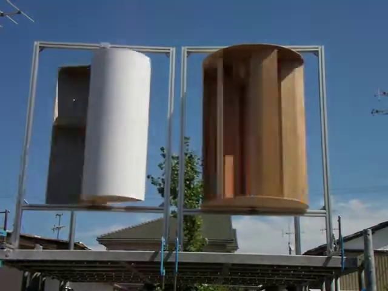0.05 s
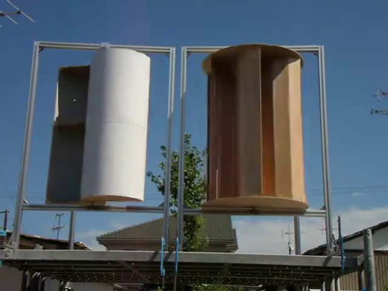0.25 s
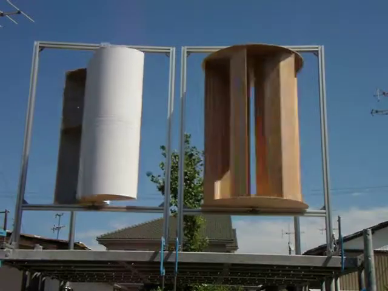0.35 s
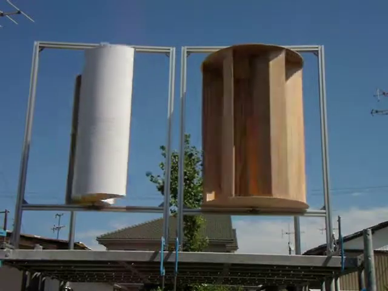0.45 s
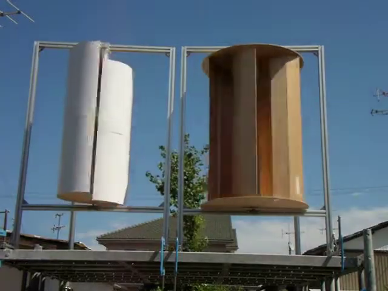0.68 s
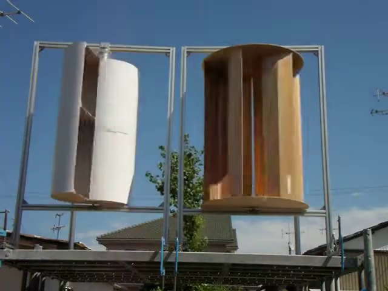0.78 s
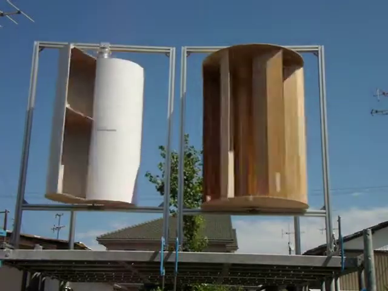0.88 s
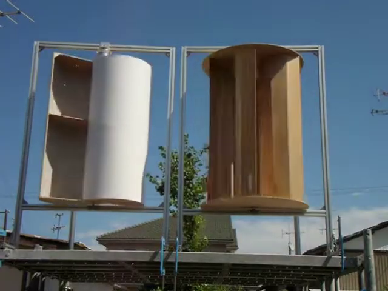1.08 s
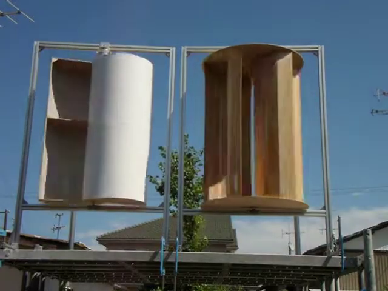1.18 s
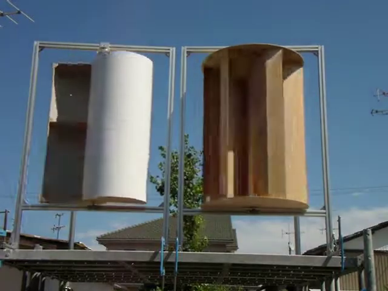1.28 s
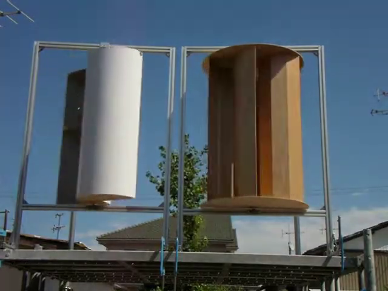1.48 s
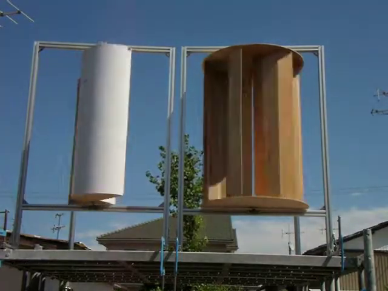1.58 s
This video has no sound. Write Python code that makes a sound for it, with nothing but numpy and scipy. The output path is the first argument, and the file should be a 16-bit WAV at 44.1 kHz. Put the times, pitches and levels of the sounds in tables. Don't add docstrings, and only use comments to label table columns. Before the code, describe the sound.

Wind blows in low, uneven flutters against an unshielded camera microphone in a yard; an early distorted thump snaps off, another heavy blow follows, then softer buffeting over faint hiss and a brief bearing squeak.

```python
import sys
import numpy as np
from scipy import signal
from scipy.fft import rfft, irfft
from scipy.io import wavfile
from scipy.ndimage import uniform_filter1d

SR = 44100
rng = np.random.default_rng(int(sys.argv[2]) if len(sys.argv) > 2 else 0)


def unload_wav(signal):
    wavfile.write(
        sys.argv[1],
        SR,
        np.round(np.clip(np.atleast_2d(signal).T, -1, 1) * 32767).astype(np.int16),
    )


def makeup_ratio(level_db):
    decades = np.asarray(level_db, float) / 20
    return 10 ** decades


N = 72765
THUMP_START_S, THUMP_END_S = .2221, .23535


def unit(x):
    return x / np.sqrt(np.mean(x ** 2))


def coloured(points):
    hz, db = np.array(points, float).T
    f = np.arange(N // 2 + 1) * SR / N
    gain = makeup_ratio(np.interp(np.log(f + 1), np.log(hz), db))
    return unit(irfft(rfft(rng.standard_normal(N)) * gain, N))


def ring(hz, width_hz):
    b, a = signal.iirpeak(hz, hz / width_hz, fs=SR)
    once = signal.lfilter(b, a, rng.standard_normal(N))
    return unit(signal.lfilter(b, a, once))


def smooth(x, k):
    return uniform_filter1d(uniform_filter1d(x, k), k)


def walk(rate_hz):
    k = int(SR / rate_hz)
    held = np.repeat(rng.standard_normal(N // k + 1), k)
    return unit(smooth(held, k)[:N])


def bell(u_s, width_ms):
    return np.exp(-np.log(2) * (2 * u_s * 1000 / width_ms) ** 2)


# crest_s, peak_db, pitch_hz, width_ms
EARLY_STRIKES = [(0.0061, -35.1, 269.0, 8.9), (0.0313, -33.2, 269.0, 5.6), (0.0785, -34.4, 269.0, 8.9),
                 (0.1032, -32.8, 288.0, 8.3), (0.1204, -33.8, 252.0, 9.5), (0.137, -29.6, 308.0, 7.8),
                 (0.1955, -29.4, 137.0, 8.4), (0.2041, -14.6, 168.0, 11.3), (0.213, -22.8, 252.0, 9.5),
                 (0.2202, -14.0, 288.0, 2.4), (0.2542, -18.8, 269.0, 2.6), (0.2603, -17.9, 220.0, 4.1),
                 (0.269, -32.8, 137.0, 17.5), (0.3041, -31.7, 179.0, 10.6), (0.3179, -25.0, 205.0, 11.7),
                 (0.3395, -28.9, 146.0, 7.9), (0.3454, -20.9, 269.0, 3.3), (0.3544, -18.4, 220.0, 10.9)]
MIDDLE_STRIKES = [(0.417, -26.4, 308.0, 6.2), (0.4241, -27.8, 179.0, 13.4), (0.4656, -27.6, 168.0, 14.3),
                  (0.4721, -27.5, 330.0, 7.3), (0.4905, -16.8, 205.0, 9.3), (0.4959, -25.4, 308.0, 7.8),
                  (0.5039, -24.3, 252.0, 9.5), (0.5098, -18.4, 157.0, 15.3), (0.5161, -16.4, 377.0, 6.4),
                  (0.5222, -5.8, 269.0, 7.1), (0.5277, -25.4, 235.0, 10.2), (0.5343, -25.9, 252.0, 9.5),
                  (0.5513, -23.0, 377.0, 6.4), (0.5578, -18.0, 235.0, 8.1), (0.566, -27.4, 157.0, 15.3),
                  (0.5717, -21.0, 288.0, 8.3), (0.5808, -20.1, 220.0, 10.9), (0.5866, -25.8, 353.0, 6.8),
                  (0.5978, -22.8, 269.0, 5.6), (0.6154, -21.1, 205.0, 11.7), (0.6245, -23.6, 220.0, 5.2),
                  (0.6676, -25.7, 179.0, 13.4), (0.6769, -19.0, 269.0, 7.1), (0.6828, -28.6, 330.0, 7.3),
                  (0.6905, -22.4, 192.0, 12.5), (0.6959, -27.5, 269.0, 8.9), (0.7338, -32.6, 168.0, 14.3),
                  (0.7524, -29.1, 205.0, 9.3), (0.7764, -26.4, 168.0, 6.9), (0.7946, -27.6, 235.0, 10.2),
                  (0.8073, -28.0, 137.0, 11.0), (0.8207, -22.1, 168.0, 14.3), (0.8268, -28.3, 288.0, 8.3),
                  (0.8501, -17.6, 192.0, 7.8), (0.8556, -32.9, 146.0, 16.4), (0.8832, -28.2, 220.0, 5.2)]
LATE_STRIKES = [(0.93, -29.4, 269.0, 8.9), (0.9356, -27.4, 192.0, 12.5), (0.942, -34.2, 128.0, 18.8),
                (0.951, -22.9, 205.0, 11.7), (0.9572, -25.4, 308.0, 7.8), (0.964, -13.8, 220.0, 4.1),
                (0.9694, -28.5, 330.0, 7.3), (0.9753, -19.6, 252.0, 6.0), (1.0501, -32.5, 235.0, 10.2),
                (1.056, -32.4, 146.0, 16.4), (1.1302, -34.9, 128.0, 14.9), (1.1669, -28.5, 235.0, 4.9),
                (1.1798, -25.4, 192.0, 6.0), (1.1885, -18.7, 220.0, 8.6), (1.2184, -31.4, 330.0, 7.3),
                (1.225, -25.6, 269.0, 5.6), (1.2393, -30.9, 330.0, 7.3), (1.2504, -31.8, 235.0, 10.2),
                (1.266, -26.3, 157.0, 12.1), (1.2894, -30.5, 137.0, 13.9), (1.303, -31.2, 377.0, 5.0),
                (1.3139, -31.9, 220.0, 6.8), (1.3343, -28.5, 137.0, 11.0), (1.3513, -30.4, 192.0, 12.5),
                (1.3796, -33.7, 137.0, 17.5), (1.4418, -35.4, 146.0, 16.4), (1.5111, -29.0, 192.0, 7.8),
                (1.5211, -33.6, 128.0, 18.8), (1.5272, -31.6, 252.0, 9.5), (1.5363, -25.5, 157.0, 9.6),
                (1.5497, -26.2, 235.0, 8.1), (1.5651, -24.5, 192.0, 12.5), (1.5767, -31.0, 288.0, 8.3),
                (1.586, -31.5, 128.0, 18.8), (1.6048, -33.2, 179.0, 13.4), (1.6222, -28.4, 179.0, 10.6)]
DEEP_STRIKES = [(0.008, -38.4, 98.0, 19.5), (0.2173, -26.9, 119.0, 5.9), (0.3492, -34.5, 74.0, 32.3),
                (0.3694, -28.9, 119.0, 20.1), (0.4297, -22.7, 98.0, 11.8), (0.4517, -32.0, 112.0, 17.0),
                (0.4776, -31.5, 80.0, 30.1), (0.5241, -20.2, 119.0, 5.9), (0.5746, -27.6, 98.0, 24.6),
                (0.6297, -36.0, 74.0, 32.3), (0.6805, -28.6, 112.0, 21.5), (0.7633, -37.5, 80.0, 30.1),
                (0.8279, -34.1, 104.0, 23.0), (0.9535, -34.6, 80.0, 30.1), (0.9739, -32.6, 119.0, 12.6),
                (1.1975, -30.7, 119.0, 15.9), (1.281, -35.0, 80.0, 23.9), (1.5633, -30.9, 104.0, 14.4)]


def eddies(t):
    rise, fall = 1.1, .8
    glide_depth, overtone, reach_s = .04, .1, .07
    out = np.zeros(N)
    rows = list(EARLY_STRIKES) + list(MIDDLE_STRIKES) + list(LATE_STRIKES) + list(DEEP_STRIKES)
    chance = rng.uniform(-1.4, 1, (len(rows), 2))
    for (crest_s, db, hz, ms), (glide, turn) in zip(rows, chance):
        i = slice(max(int((crest_s - reach_s) * SR), 0), min(int((crest_s + reach_s) * SR), N))
        u = t[i] - crest_s
        phase = 2 * np.pi * hz * u * (1 + glide_depth * glide * u * 1000 / ms)
        shape = bell(u, ms * np.where(u < 0, rise, fall))
        second = overtone * shape * np.cos(2 * phase + np.pi * turn)
        out[i] += makeup_ratio(db) * shape * (np.cos(phase) + second)
    return out


# time_s, turbulence_db, bright_share (0-1)
GUST_COURSE = [(0, -47, 0.62), (.13, -44, 0.53), (.19, -42, 0.8), (.28, -42.5, 0.8), (0.331, -42, 0.93),
               (.39, -43, 0.6), (.47, -41.5, 0.6), (.59, -37, 0.23), (0.646, -38.5, 0.36),
               (.72, -44.5, 0.8), (.81, -40.5, 0.5), (.89, -44, 0.63), (1.09, -44.5, 0.5),
               (1.221, -42.5, 0.67), (1.321, -40.5, 0.32), (1.45, -48.5, 0.63), (1.55, -36.5, 0.2),
               (1.65, -43.5, .4)]
# freq_hz, density_db
DEEP_COLOUR = [(30, -29.5), (55, -12), (90, -0.5), (140, 1), (200, -7.5), (350, -14), (700, -69.5)]
# freq_hz, density_db
BRIGHT_COLOUR = [(60, -27), (140, -12.5), (240, -1.5), (330, 0), (480, -5.5), (700, -18.5), (1200, -63)]


def buffeting(t, strikes):
    flutter_db, flutter_hz = 2.0, 60
    wake_db, wake_s = -20, .02
    when, db, share = np.array(GUST_COURSE, float).T
    share = np.clip(np.interp(t, when, share), 0, 1)
    wake = makeup_ratio(wake_db) * np.sqrt(np.abs(smooth(strikes ** 2, int(wake_s * SR))))
    size = makeup_ratio(np.interp(t, when, db)) + wake
    deep = coloured(DEEP_COLOUR) * makeup_ratio(flutter_db * walk(flutter_hz))
    bright = coloured(BRIGHT_COLOUR) * makeup_ratio(flutter_db * walk(flutter_hz))
    return size * (np.sqrt(1 - share) * deep + np.sqrt(share) * bright)


def thump(t):
    from_hz, to_hz, bend = 170, 515, 3.3
    level_db, rise_s, rough = -4.4, .003, .04
    first_s, first_width_s, first_gain = .2261, .0006, .5
    last_s, last_gain = .0015, .7
    u = np.clip(t - THUMP_START_S, 0, THUMP_END_S - THUMP_START_S)
    hz = from_hz + (to_hz - from_hz) * (u / u.max()) ** bend
    on = (t > THUMP_START_S) & (t < THUMP_END_S)
    swing = -np.sin(2 * np.pi * np.cumsum(hz * on) / SR) + rough * ring(560, 810)
    swing = swing * (1 + first_gain * np.exp(-((t - first_s) / first_width_s) ** 2))
    swing = swing * (1 + last_gain * np.clip(1 - (THUMP_END_S - t) / last_s / 2, 0, 1))
    return on * makeup_ratio(level_db) * np.clip(u / rise_s, 0, 1) * swing


# centre_s, level_db, pitch_hz, width_ms
EDDY_BRIGHT_SWINGS = [(0.1193, -34.5, 876.0, 3.7), (0.1406, -35.7, 955.0, 3.4), (0.1893, -34.2, 955.0, 3.4),
                      (0.2034, -36.0, 955.0, 3.4), (0.2065, -25.3, 403.0, 7.9), (0.2118, -32.6, 522.0, 6.1),
                      (0.217, -32.0, 876.0, 1.7), (0.4887, -29.3, 370.0, 4.1), (0.5068, -25.1, 403.0, 3.7),
                      (0.5108, -28.7, 676.0, 1.5), (0.5181, -28.5, 370.0, 2.7), (0.5196, -16.8, 569.0, 3.9),
                      (0.5199, -24.3, 1041.0, 3.1), (0.5207, -32.5, 1601.0, 0.9), (0.5252, -30.9, 621.0, 5.2),
                      (0.526, -26.2, 403.0, 3.7), (0.5557, -23.5, 479.0, 3.1), (0.5695, -25.5, 522.0, 2.9),
                      (0.5775, -29.9, 370.0, 8.6), (0.5849, -33.5, 479.0, 6.7), (0.5965, -34.5, 403.0, 7.9),
                      (0.6702, -29.1, 440.0, 7.3), (0.6791, -30.5, 522.0, 6.1), (0.691, -31.3, 370.0, 8.6),
                      (0.7969, -34.9, 955.0, 3.4), (0.8177, -33.5, 440.0, 7.3), (0.8489, -30.6, 403.0, 5.5),
                      (0.9594, -28.7, 522.0, 2.9), (0.9739, -29.7, 440.0, 7.3), (0.9766, -31.4, 676.0, 2.2)]
# centre_s, level_db, pitch_hz, width_ms
BLOW_BRIGHT_SWINGS = [
    (.2255, -13, 800, 1.2),
    (.2278, -14, 750, 1.4),
    (.2287, -17, 850, 1.2),
    (.233, -20, 1100, 1),
    (.5203, -29, 1400, 1.8),
]


def bright_swings(t):
    out = np.zeros(N)
    for s, db, hz, ms in list(EDDY_BRIGHT_SWINGS) + list(BLOW_BRIGHT_SWINGS):
        out += makeup_ratio(db) * bell(t - s, ms) * np.sin(2 * np.pi * hz * (t - s))
    return out


# pitch_hz, wobble_rad, level_db (rms)
SQUEAK_PARTIALS = [(1110, .9, -44.5), (1180, 1.2, -46.5), (1270, 1.3, -46)]


def squeak(t):
    start_s, attack_s, hold_s, release_s = 1.525, .03, .055, .06
    dulling_db_per_s_hz = .8
    u = t - start_s
    fall = (u - attack_s - hold_s) / release_s
    shape = np.clip(u / attack_s, 0, 1) ** 2 * np.clip(1 - fall, 0, 1) ** 2
    dull = dulling_db_per_s_hz * np.clip(u - attack_s, 0, 1)
    lowest_hz = SQUEAK_PARTIALS[0][0]
    out = np.zeros(N)
    for hz, wobble, db in SQUEAK_PARTIALS:
        level = makeup_ratio(db - dull * (hz - lowest_hz) + 1.3 * walk(62.4))
        out += np.sqrt(2) * level * np.sin(2 * np.pi * hz * t + wobble * walk(90))
    return shape * out


# freq_hz, density_db
HISS_COLOUR = [(150, -10.5), (500, -3), (660, -3), (880, -1.5), (1390, -6.5), (2090, -7), (3750, -12),
               (4300, -18)]
# pitch_hz, level_db (rms)
MOTOR_WHINES = [(2160, -65.5)]


def yard(t):
    settle_s = .26
    hiss_db, hiss_start_db = -45, 3.5
    hum_db, hum_start_db, hum_hz, hum_width_hz = -53, 6.5, 886, 99
    start = np.exp(-(t / settle_s) ** 2)
    out = makeup_ratio(hiss_db + hiss_start_db * start + 0.31 * walk(10)) * coloured(HISS_COLOUR)
    out += makeup_ratio(hum_db + hum_start_db * start + 1.0 * walk(1.5)) * ring(hum_hz, hum_width_hz)
    for hz, db in MOTOR_WHINES:
        level = np.sqrt(2) * makeup_ratio(db + 1.4 * walk(9.1))
        out += level * np.sin(2 * np.pi * hz * t + .5 * walk(23))
    return out


def scene():
    low_cut_hz, mute_s = 36, .012
    t = np.arange(N) / SR
    hush = np.where(t < THUMP_END_S, 1, np.clip((t - THUMP_END_S) / mute_s, .2, 1))
    strikes = eddies(t)
    low_cut = signal.butter(2, low_cut_hz, "high", fs=SR, output="sos")
    wind = signal.sosfiltfilt(low_cut, strikes) + buffeting(t, strikes)
    return (hush * wind + thump(t) + bright_swings(t) + squeak(t) + yard(t))[None]


def low_pass(x):
    return signal.sosfilt(signal.butter(12, 16000, fs=SR, output="sos"), x)


def record(dry):
    input_limit, second_limit, offset = .705, .69, .011
    top_hz, output_top_hz = 4400, 8100
    leak_db, snap_s = -14, .001
    hard = np.clip(dry, -input_limit, input_limit)
    x = signal.sosfilt(signal.cheby2(14, 55, top_hz, fs=SR, output="sos"), hard)
    edge = signal.sosfiltfilt(signal.butter(6, top_hz, "high", fs=SR, output="sos"), hard)
    near = np.clip(2 - 2 * np.abs(np.arange(N) / SR - THUMP_END_S) / snap_s, 0, 1)
    x = np.clip(x, -second_limit, second_limit) + makeup_ratio(leak_db) * edge * near
    x = signal.sosfilt(signal.butter(2, output_top_hz, fs=SR, output="sos"), x) + offset
    return low_pass(x)


dry = scene()
out = record(dry)
unload_wav(out)
```